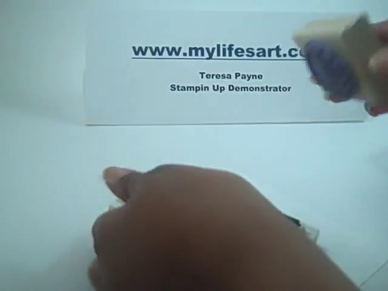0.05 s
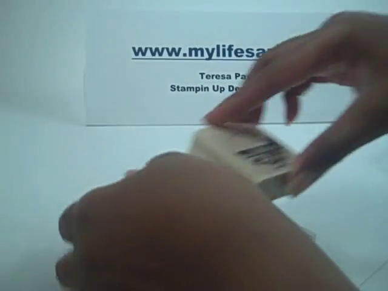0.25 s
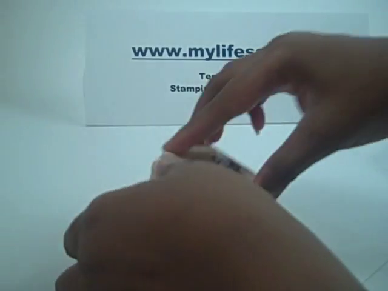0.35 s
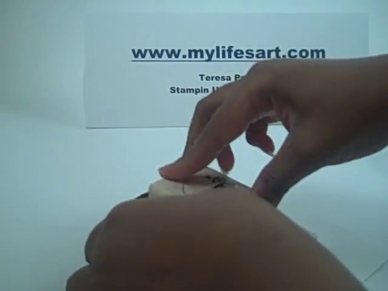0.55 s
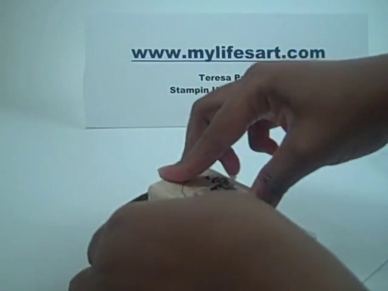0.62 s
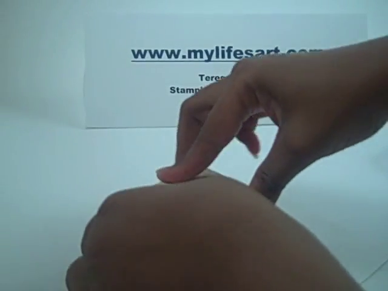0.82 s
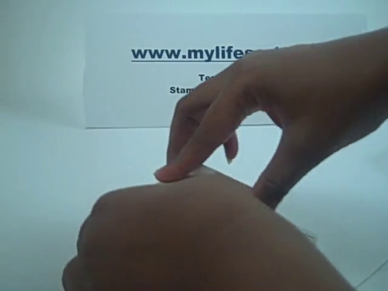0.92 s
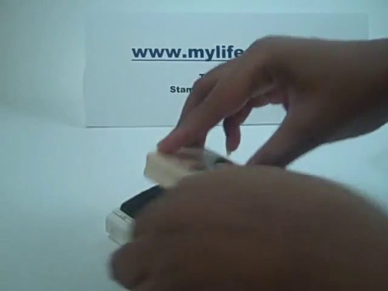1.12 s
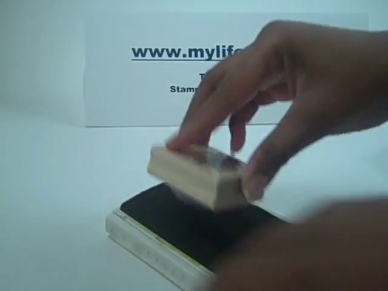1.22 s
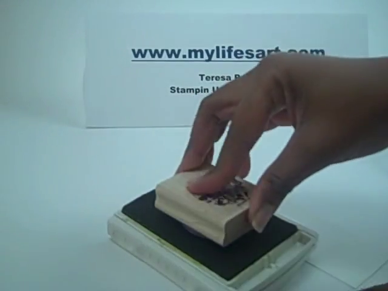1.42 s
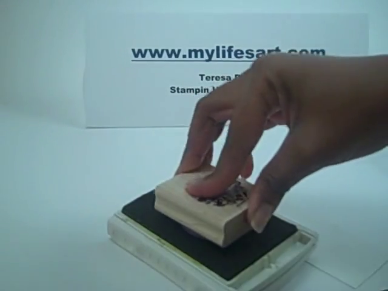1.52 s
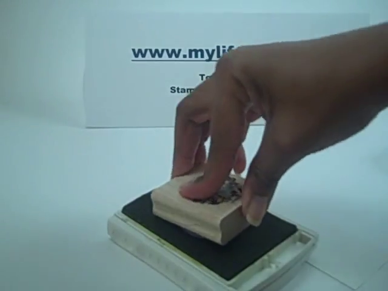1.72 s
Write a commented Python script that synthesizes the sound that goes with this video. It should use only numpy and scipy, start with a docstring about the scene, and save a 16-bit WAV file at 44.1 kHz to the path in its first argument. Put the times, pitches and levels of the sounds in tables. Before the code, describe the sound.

A wood-mounted rubber stamp knocks sharply on an ink pad after a brief scuff of its plastic case. It rubs and clicks softly, peels off and knocks again, close to the microphone in a small room.

```python
"""A brief scuff, then the sharp wooden knock of a rubber stamp on an ink pad in its plastic case.
Close to the microphone, on a paper-covered table, the case slides and the wood-mounted stamp lands.
It is rocked and pressed, peels off the tacky ink and lands again. Each blow rings block, case and table;
the rubbing rasps, hisses and faintly squeaks. A small room answers, and a fan hums far down in level."""
import sys
import numpy as np
from scipy import signal
from scipy.fft import rfft, irfft, next_fast_len
from scipy.io import wavfile
from scipy.ndimage import map_coordinates

SR = 44100
rng = np.random.default_rng(int(sys.argv[2]) if len(sys.argv) > 2 else 0)


def transcribe(signal):
    """Save signal, clipped to [-1, 1], as a 16-bit WAV file at the path in sys.argv[1]."""
    frames = np.atleast_2d(signal).T
    limited = np.clip(frames, -1, 1)
    pcm = np.round(limited * 32767).astype(np.int16)
    wavfile.write(sys.argv[1], SR, pcm)


N = 77175


def amp(db):
    """Decibels to gain."""
    return 10 ** (np.asarray(db) / 20)


def unit(x):
    """Scale to rms 1."""
    return x / np.sqrt(np.mean(x ** 2) + 1e-20)


def along(points, hz):
    """Read a curve of (freq_hz, value) points on a log frequency axis."""
    freqs, values = np.transpose(points)
    return np.interp(np.log(hz + 1), np.log(freqs + 1), values)


def filtered(x, response):
    """Filter x by a gain given as a function of frequency."""
    size = next_fast_len(len(x) + 8192)
    return irfft(rfft(x, size) * response(np.fft.rfftfreq(size, 1 / SR)), size)[:len(x)]


def coloured(x, spectrum):
    """Shape x by (freq_hz, level_db) points, at rms 1."""
    return unit(filtered(x, lambda hz: amp(along(spectrum, hz))))


def wobble(rate):
    """A smooth random curve, rate knots a second."""
    return map_coordinates(rng.standard_normal(int(N * rate / SR) + 4), [np.arange(N) * rate / SR])


def add(track, start_s, sound):
    """Mix a sound in at start_s."""
    part = track[max(round(start_s * SR), 0):][:len(sound)]
    part += sound[:len(part)]


# Room air and microphone hiss: freq_hz, level_db
AIR_SPECTRUM = [(20, 2.5), (35, -17.5), (60, -9), (110, -11.5), (170, -8), (330, -7), (500, -10),
                (700, -11.5), (900, -15), (1600, -16.5), (3600, -19.5), (7000, -27), (10800, -26.5),
                (17000, -34)]
# The fan, faint in the background: pitch_hz, level_db
FAN_TONES = [(291, -75), (517, -77), (560, -74), (716, -66.5)]


def fan_and_air(drift_hz=1.44, waver_db=-1.9, air_db=-60.5):
    """The slightly unsteady tones of a fan over room air and microphone hiss."""
    hum = np.zeros(N)
    for hz, db in FAN_TONES:
        gain = amp(db + waver_db * wobble(8.62)) * np.sqrt(2)
        cycles = np.cumsum(hz + drift_hz * wobble(11.9)) / SR
        hum += gain * np.sin(2 * np.pi * cycles)
    return hum + amp(air_db) * coloured(rng.standard_normal(N), AIR_SPECTRUM)


# Decay of the small room: freq_hz, t60_s
ROOM_DECAY = [(150, 0.49), (500, 0.6), (1200, 0.3), (3000, 0.31), (8000, 0.2), (16000, 0.12)]
# Colour of its echoes at the microphone: freq_hz, gain_db
ECHO_COLOUR = [(150, -4), (400, 2.5), (900, -1.5), (1400, -2), (2300, -2.5), (4000, -3.5), (9000, 2.5),
               (16000, -9)]


def room(x, near_db=-9.5, near_t60_s=0.053, tail_db=-18.5):
    """Quick echoes from the table and nearby things, then the tail of a small room."""
    hz, t, bands = signal.stft(rng.standard_normal(SR // 2), SR, nperseg=256)
    bands = bands * amp(-60 * t / along(ROOM_DECAY, hz)[:, None])
    tail = signal.istft(bands, SR, nperseg=256)[1]
    near = rng.standard_normal(len(tail)) * amp(-60 * np.arange(len(tail)) / SR / near_t60_s)
    impulse = np.zeros(SR)
    add(impulse, start_s=0.004, sound=amp(near_db) * near / np.linalg.norm(near))
    add(impulse, start_s=0.009, sound=amp(tail_db) * tail / np.linalg.norm(tail))
    echoes = signal.fftconvolve(x, impulse)[:N]
    return filtered(echoes, lambda hz: amp(along(ECHO_COLOUR, hz)))


# Blows that set the room booming: start_s, level_db
ROOM_BOOMS = [(.229, -53), (0.486, -58), (1.36, -47.5)]
# Low modes of the room: pitch_hz, level_db, t60_s
ROOM_MODES = [(168, -5.5, .22), (205.6, -3.5, 0.4), (263, -2, 0.26), (333, 4.5, 0.154), (425, -7, 0.09)]


def room_booms(rise_s=0.0018):
    """The room's low modes boom after a blow and outlast it."""
    out, t = np.zeros(N), np.arange(SR // 2) / SR
    for start, db in ROOM_BOOMS:
        ring = sum(amp(mode_db - 60 * t / t60) * np.sin(2 * np.pi * (hz * t + rng.random()))
                   for hz, mode_db, t60 in ROOM_MODES)
        add(out, start, amp(db) * ring * (1 - np.exp(-t / rise_s)))
    return out


# Rubber and case catching faintly: start_s, length_s, pitch_hz, glide_share, level_db
CATCHES = [(0.189, .028, 2415, -.15, -46), (.737, .012, 3950, 0.0, -52), (0.731, 0.1, 1650, -.05, -65),
           (0.774, 0.067, 2166, 0.0, -63), (1.117, 0.045, 1400, .08, -62), (1.199, .013, 11100, 0.0, -53.5)]


def squeaks(width_share=0.2):
    """Stick and slip at an unsteady rate: a fuzzy tone that swells and fades."""
    out, t = np.zeros(N), np.arange(N) / SR
    for start, length, hz, glide, db in CATCHES:
        progress = np.clip((t - start) / length, 0, 1)
        fuzz = unit(filtered(rng.standard_normal(N), lambda f: 1 / (1 + (2 * f / (width_share * hz)) ** 2)))
        cycles = np.cumsum(hz * (1 + glide * (progress - 0.5))) / SR
        swell = amp(db) * np.sqrt(2) * np.sin(np.pi * progress)
        out += swell * fuzz * np.sin(2 * np.pi * cycles)
    return out


def friction(spectrum, judder_db, slips_per_s=1400, slip_share=0.35):
    """Tiny slips over a smooth rub, in a grip that keeps changing."""
    slips = (rng.random(N) < slips_per_s / SR) * rng.standard_normal(N)
    drive = np.sqrt(slip_share) * unit(slips) + np.sqrt(1 - slip_share) * rng.standard_normal(N)
    return coloured(drive * amp(judder_db * wobble(160)), spectrum)


# Case, stamp and fingers sliding close by: start_s, length_s, scuff_db, rasp_db, hiss_db, growth_db
SLIDES = [(-.005, 0.069, -52.5, -48.5, -55, -13.5), (0.056, 0.029, -53.5, -51.5, -54.5, -1),
          (0.084, 0.13, -66, -50, -45, 1.5), (0.203, 0.044, -59, -45.5, -45.5, -6),
          (0.231, 0.031, -53, -47.5, -55, 7.5), (0.309, 0.044, -58.5, -47, -60.5, -2.5),
          (0.353, 0.028, -67, -51.5, -51.5, 5.5), (.401, .017, -69, -59, -66, 4.5),
          (0.451, 0.033, -70, -62, -63, -4), (0.483, 0.099, -56.5, -53.5, -64.5, -7),
          (0.596, 0.08, -74, -64, -65.5, -4), (0.676, 0.056, -66, -58.5, -63.5, -5.5),
          (0.732, 0.12, -70, -60, -63, 3.5), (0.864, 0.052, -82, -69, -68, 5),
          (1.105, 0.055, -68.5, -65.5, -64.5, 11), (1.16, .02, -71, -54, -53.5, -1),
          (1.191, 0.018, -72, -64, -57.5, 12), (1.346, .012, -56, -53, -52, 2),
          (1.357, 0.059, -49.5, -54, -53, -16.5), (1.544, 0.054, -76, -76, -60.5, 5),
          (1.669, 0.061, -71, -72, -62.5, -4)]
# The rubbed surfaces, sticky ink hissing higher than paper: freq_hz, level_db
TABLE_SCUFF = [(30, -41), (150, -14.5), (320, -3), (800, -1.5), (1200, -2.5), (2000, -22), (5000, -17),
               (17000, -69)]
CASE_RASP = [(30, -27), (700, -17.5), (1300, -5), (1700, 2), (2300, 0), (2750, -0.5), (3300, -0.5),
             (4300, -8.5), (6000, -11.5), (17000, -61)]
PAPER_HISS = [(30, -47), (2000, -36), (4500, -3.5), (6500, 0.5), (8000, 0), (10500, -0.5), (13000, -7),
              (17000, -14)]
INK_HISS = [(30, -53), (2000, -33), (4500, -8.5), (6500, -5), (9000, -1), (11500, -1.5), (13500, -7),
            (17000, -14)]


def rubbing(rise_s=0.0041, release_s=0.003, ink_from_s=0.28):
    """Each stroke scuffs the table, rasps the case and hisses: early ones on paper, later ones on ink."""
    t, power = np.arange(N) / SR, np.zeros((3, N))
    for start, length, scuff_db, rasp_db, hiss_db, growth_db in SLIDES:
        age = t - start
        gate = np.clip(age / rise_s, 0, 1) * np.exp(-np.maximum(age - length, 0) / release_s)
        growth = amp(growth_db * (np.clip(age / length, 0, 1) - 0.5))
        power += (amp([scuff_db, rasp_db, hiss_db])[:, None] * gate * growth) ** 2
    scuff_gain, rasp_gain, hiss_gain = np.sqrt(power)
    paper = friction(PAPER_HISS, judder_db=1.3)
    ink = friction(INK_HISS, judder_db=1.5)
    scuff = friction(TABLE_SCUFF, judder_db=0.5)
    rasp = friction(CASE_RASP, judder_db=1.5)
    return scuff_gain * scuff + rasp_gain * rasp + hiss_gain * np.where(t < ink_from_s, paper, ink)


# Fingernails, wood and plastic tapping near the microphone: start_s, clack_db, snap_db
SMALL_TAPS = [(.06, -35, -49), (0.064, -34.5, -57), (0.2195, -25, -25.5), (0.2259, -15, -27),
              (0.33, -39, -36), (0.3455, -35, -35.5), (0.484, -52, -47), (0.5358, -34.5, -42.5),
              (0.6792, -43, -55), (.74, -38, -49), (.827, -42, -52), (.851, -46, -49), (1.087, -56, -45.5),
              (1.108, -58, -44), (1.3454, -54, -41.5), (1.3544, -37, -30), (1.3759, -32.5, -58),
              (1.535, -54, -51.5)]
# The clack of the case and the snap of the contact itself: freq_hz, level_db
CASE_CLACK = [(60, -52), (200, -33), (900, -3.5), (1700, -4.5), (3300, 4.5), (5000, -14.5), (8000, -30),
              (17000, -68)]
CONTACT_SNAP = [(200, -32), (2500, 3), (5000, -6.5), (8000, 2), (11000, -5), (17000, -14.5)]


def taps(clack_t60_s=0.014, clack_rise_s=0.00096, snap_t60_s=0.0064):
    """Light hard contacts: a bright snap, then a short clack of the case."""
    out, t = np.zeros(N), np.arange(SR // 20) / SR
    for start, clack_db, snap_db in SMALL_TAPS:
        clack = amp(clack_db - 60 * t / clack_t60_s) * coloured(rng.standard_normal(len(t)), CASE_CLACK)
        snap = amp(snap_db - 60 * t / snap_t60_s) * coloured(rng.standard_normal(len(t)), CONTACT_SNAP)
        add(out, start, snap + clack * (1 - np.exp(-t / clack_rise_s)))
    return out


# Block, case and table ringing together: pitch_hz, level_db, t60_s
WOOD_MODES = [(400, -20, 0.0075), (729, -13.5, 0.018), (1077, -3.5, 0.0084), (1403, -5.5, 0.013),
              (1872, -9.5, 0.02), (2016, -8, 0.012), (2487, -10, 0.014), (3560, -10.5, 0.015),
              (4270, -21.5, 0.007), (4770, -14.5, 0.02)]


def wood_ring(hardness_hz, pitch_ratio, contact_s=0.00028, scatter_db=-0.24):
    """One pulse rings the wood; a softer one leaves out the high modes."""
    t = np.arange(SR // 10) / SR
    ring = np.zeros(len(t))
    for k, (hz, db, t60) in enumerate(WOOD_MODES):
        decay = amp(db + scatter_db * rng.normal() - 60 * t / t60)
        rolloff = np.hypot(1, (hz * pitch_ratio / hardness_hz) ** 2)
        ring += (-1) ** k * decay * np.sin(2 * np.pi * hz * pitch_ratio * t) / rolloff
    ring *= 1 - np.exp(-t / contact_s)
    return ring / np.abs(ring).max()


# The stamp landing on the pad, close to the microphone: start_s, first_db, first_hardness_hz,
# pitch_ratio, second_delay_s, second_over_first_db, second_hardness_hz
LANDINGS = [(0.2253, -10, 3600, 0.994, 0.001821, 4.5, 2340), (.4849, -24, 820, 1.02, 0.001803, -2.5, 397),
            (1.3443, -21.5, 746, 1.107, .00168, 5.5, 650), (1.3556, -22.5, 2070, 1.023, 0.0012, 9, 1470)]


def stamp_knocks(low_cut_hz=290):
    """Each knock is a first pulse and a second 1-2 ms later; the knocks carry little bass."""
    out = np.zeros(N)
    for start, first_db, first_hz, pitch_ratio, delay, second_over_first_db, second_hz in LANDINGS:
        add(out, start, amp(first_db) * wood_ring(first_hz, pitch_ratio))
        add(out, start + delay, amp(first_db + second_over_first_db) * wood_ring(second_hz, pitch_ratio))
    return signal.sosfilt(signal.butter(2, low_cut_hz, "high", fs=SR, output="sos"), out)


def scene():
    """Knocks and rubbing echo in a small room, the rubbing slightly drier."""
    blows = stamp_knocks() + taps()
    rubs = rubbing() + squeaks()
    echoes = room(blows) + amp(-1) * room(rubs)
    return (blows + rubs + echoes + room_booms() + fan_and_air())[None]


def record(dry, top_hz=17300):
    """The recorder keeps nothing above its band limit."""
    return np.array([filtered(channel, lambda hz: hz < top_hz) for channel in dry])


dry = scene()
out = record(dry)
transcribe(out)
```